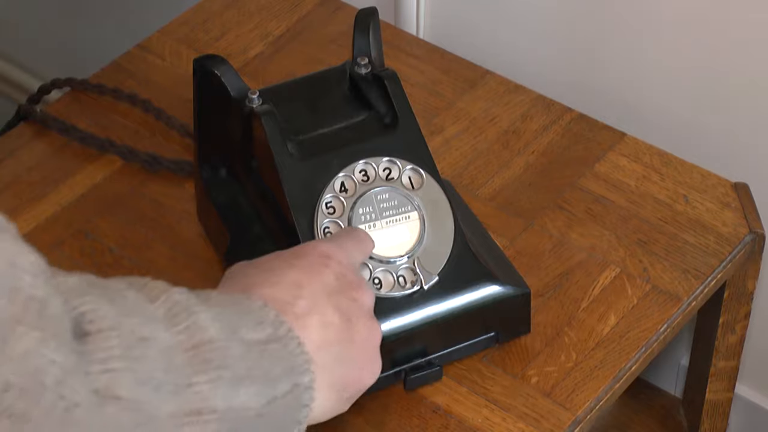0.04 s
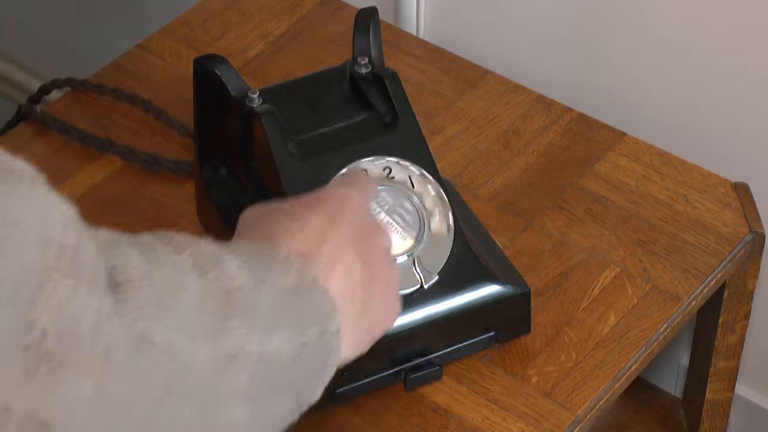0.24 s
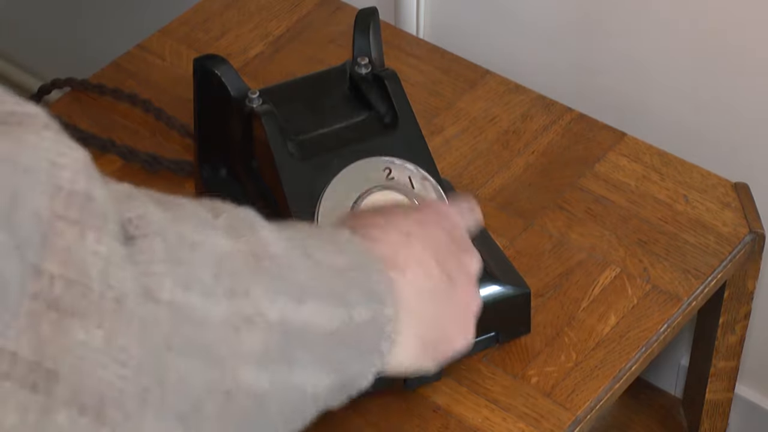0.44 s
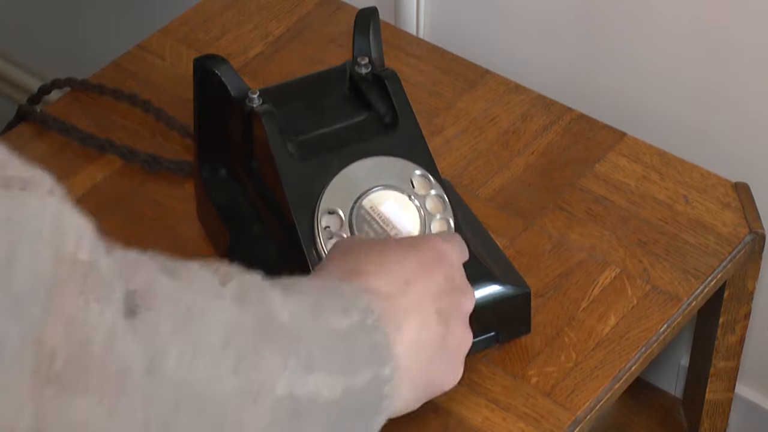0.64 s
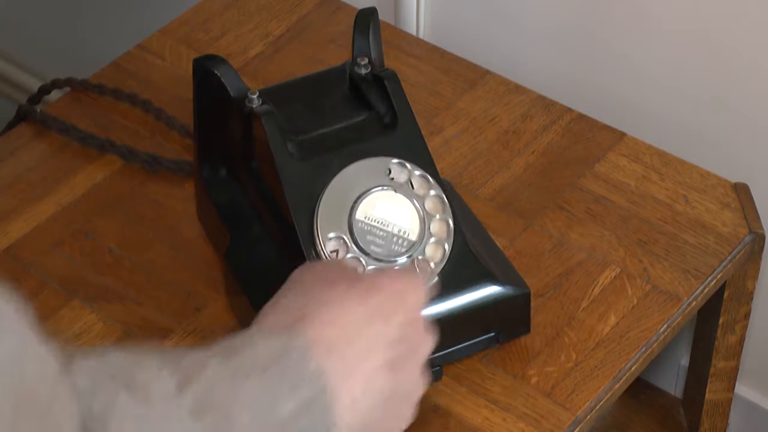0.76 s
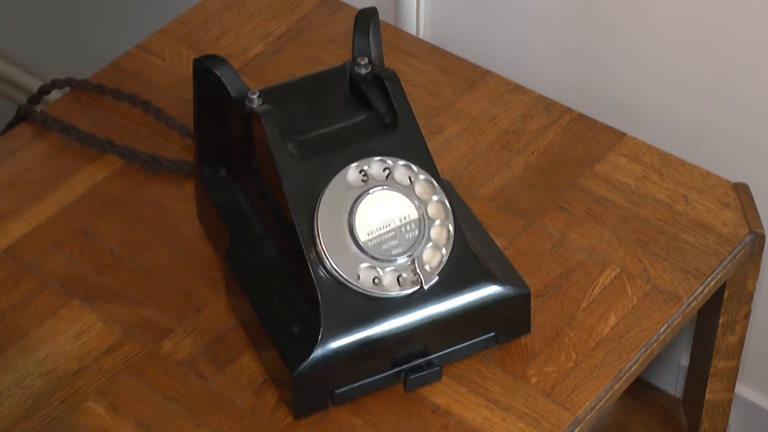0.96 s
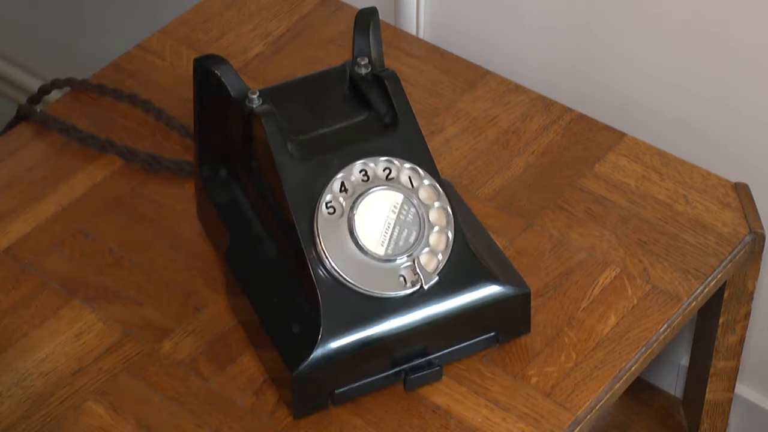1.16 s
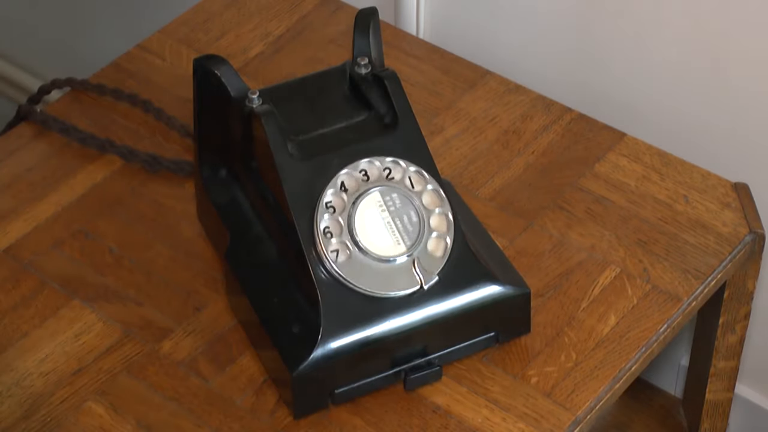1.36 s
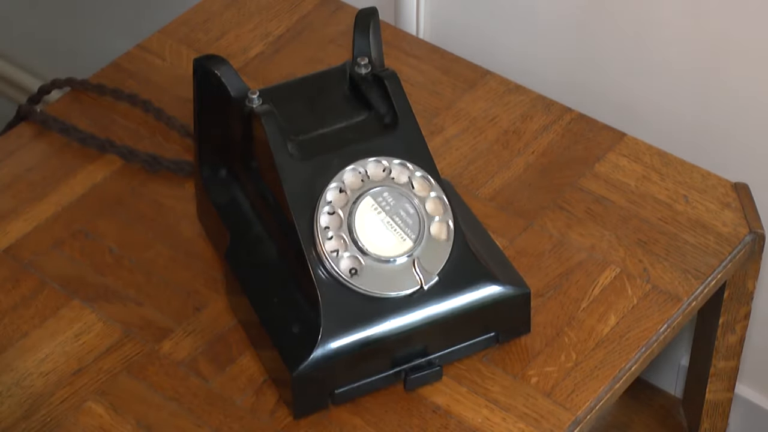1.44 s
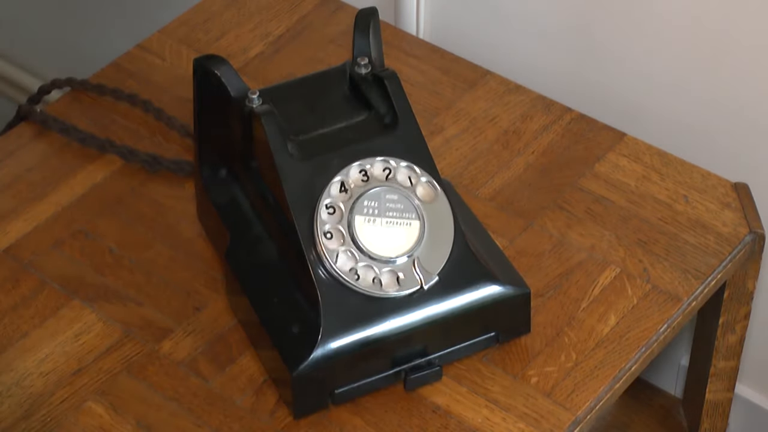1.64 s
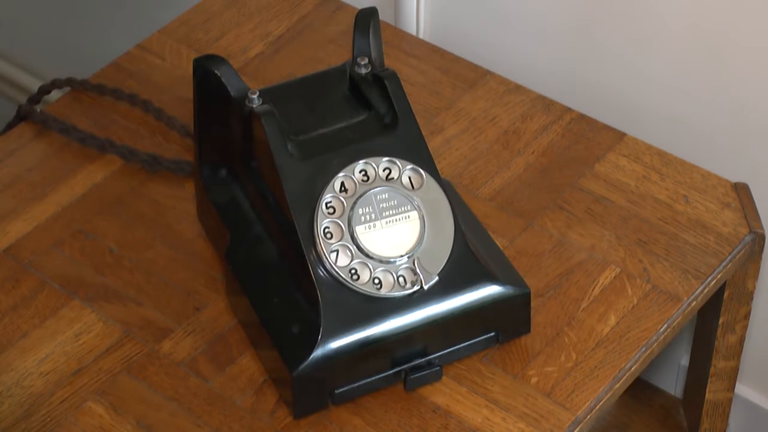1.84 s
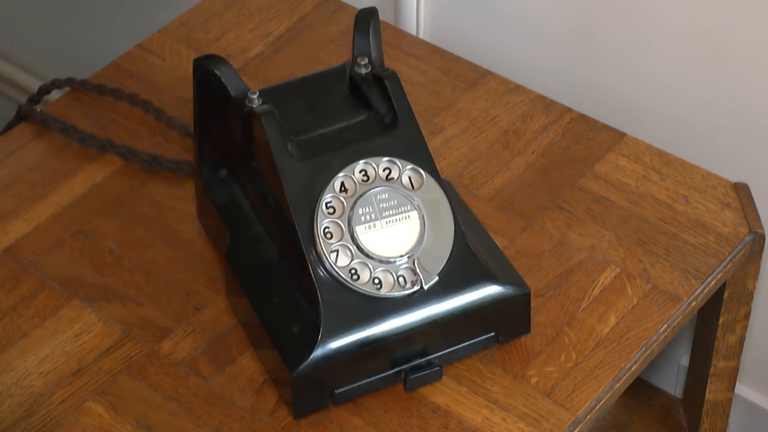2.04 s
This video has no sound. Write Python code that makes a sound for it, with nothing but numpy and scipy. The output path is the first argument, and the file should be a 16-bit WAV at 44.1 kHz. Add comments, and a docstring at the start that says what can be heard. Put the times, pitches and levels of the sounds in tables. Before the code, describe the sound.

Rotary phone dialling one digit: ratcheting clicks, a metallic clink and a rattling return.

```python
"""An old rotary telephone on a wooden table in a quiet room, microphone close by. One digit is dialled.
A finger catches the wheel and winds it over a clicking ratchet until it meets the metal stop.
Let go, the wheel runs back: gears and governor rattle and briefly squeal, and contacts tick.
The wheel knocks home, and a faint rustle follows over the low hum and hiss of the room."""
import sys
import numpy as np
from scipy import signal
from scipy.fft import rfft, irfft
from scipy.io import wavfile
from scipy.ndimage import uniform_filter1d

SR = 44100
rng = np.random.default_rng(int(sys.argv[2]) if len(sys.argv) > 2 else 0)


def master_out(mix):
    """Clip the mix to full scale and print it as 16-bit PCM to the path in sys.argv[1]."""
    frames = np.transpose(np.atleast_2d(mix))
    ceiling = np.clip(frames, -1, 1)
    pcm = np.round(ceiling * 32767).astype(np.int16)
    wavfile.write(sys.argv[1], SR, pcm)


N = 92610

# Drive of the returning wheel: time_s, relative_db
RETURN_DRIVE = [(.706, -50), (.717, -33.5), (.76, -33), (.92, -30), (.98, -32.5), (1.06, -31.5),
                (1.15, -31), (1.19, -32.5), (1.28, -29.5), (1.385, -33), (1.5, -29.5), (1.61, -27),
                (1.636, -36.5), (1.66, -30), (1.69, -33), (1.8, -32), (1.816, -31), (1.83, -58)]
# Ticks of contacts and gear play: time_s, works_relative_db, snap_relative_db
CONTACT_TICKS = [(0.758, -35, -24), (.776, -18.5, -25), (.81, -32, -25.5), (.843, -42, -21.5),
                 (0.87, -32, -37), (.931, -24, -25), (0.963, -40, -30), (.977, -38, -31), (1, -23, -22),
                 (1.016, -22.5, -26), (1.04, -24.5, -37), (1.073, -46, -28), (1.127, -49, -24),
                 (1.143, -23.5, -24), (1.16, -19, -30), (1.217, -24, -23.5), (1.323, -22.5, -24),
                 (1.361, -20.5, -28), (1.398, -20.5, -27.5), (1.429, -25, -27.5), (1.467, -18.5, -25),
                 (1.516, -33, -24), (1.547, -44, -33), (1.597, -24, -33), (1.65, -21, -32),
                 (1.661, -22, -26), (1.706, -22.5, -23), (1.744, -22, -45), (1.766, -36, -25.5),
                 (1.803, -22, -31)]
# Resonances of the works and of the ticks' bright snap: pitch_hz, width_hz, gain_db
WORKS_MODES = [(391, 25, 4), (959, 26.8, 16.5), (1070, 82, 10.5), (1515, 33, 13.5), (1543, 153, 8),
               (1944, 116, 5), (2401, 205, 14.5), (2500, 71, 18.5), (2850, 76, 2.5), (3012, 134, 10),
               (3660, 180, 5.5), (4600, 350, 2.5), (5530, 60, 0), (8100, 69, 4.5), (9160, 40, 5),
               (9315, 49, 11.5), (11000, 290, -7), (12900, 300, -17), (14100, 350, -17)]
SNAP_MODES = [(3760, 160, 2), (4220, 170, -8), (4750, 440, 10.5), (8330, 350, -1), (9260, 170, 3.5)]
# Broad tone under each set of resonances: frequency_hz, gain_db
WORKS_COLOUR = [(120, -17.5), (240, -1), (500, -10.5), (800, -8), (1250, -2.5), (1750, -15), (3300, -10.5),
                (4200, 5), (5400, -5), (6600, 2.5), (7300, -4), (7800, 1), (8800, -7.5), (10200, -12.5),
                (11700, -21), (15500, -30)]
SNAP_COLOUR = [(500, -26), (2000, -12), (3300, -5), (5400, -3.5), (6600, -3), (8800, -21), (10200, -23),
               (15500, -35)]


def running_back(t, governor_hz=27.49, teeth=12, slips_per_s=7000, scatter_db=2, tick_decay_s=0.0065):
    """Tiny slips of governor and gears ring the works; the contacts tick over them."""
    wander = 0.00995 * unit(uniform_filter1d(rng.standard_normal(N), size=4000))
    angle = 2 * np.pi * np.cumsum(governor_hz * (1 + wander)) / SR
    # Friction swings once a turn, once for each of two weights and once for each tooth.
    grip = np.exp(0.12 * np.cos(angle) + 0.15 * np.cos(2 * angle) + 0.35 * np.cos(teeth * angle))
    slips = (rng.random(N) < slips_per_s / SR) * np.sign(rng.standard_normal(N))
    slips *= undb(scatter_db * rng.standard_normal(N))
    drive = undb(np.interp(t, *np.array(RETURN_DRIVE).T, left=-np.inf, right=-np.inf))
    friction = unit(slips * grip) * drive
    lead_s = tick_decay_s / 2  # each tick starts to swell just before its time
    jolts = blows([(at - lead_s, db, tick_decay_s) for at, db, _ in CONTACT_TICKS], attack=0.58)
    snaps = blows([(at - lead_s, db, tick_decay_s) for at, _, db in CONTACT_TICKS], attack=0.51)
    works = ring(undb(-0.6) * friction + undb(-8) * jolts, body(WORKS_COLOUR, WORKS_MODES))
    bright_ticks = ring(undb(-8) * snaps, body(SNAP_COLOUR, SNAP_MODES))
    return works + singing(t, friction) + bright_ticks


# Ratchet clicks: start_s, relative_db, decay_s, pitch_hz, ring_db, shared_modes_db
RATCHET_CLICKS = [(0.2463, -24, 0.0025, 6940, 8, -12), (0.3043, -26, 0.0029, 4470, 13, 0),
                  (.3268, -30.5, 0.0033, 12200, -5, 0), (0.3355, -30.5, 0.0019, 4000, -7, 7),
                  (0.3624, -23, 0.004, 4670, -6, 0), (0.3932, -23, 0.0047, 4370, -3, 2),
                  (.425, -22, 0.0037, 4250, -3, -2), (0.4605, -23, 0.0043, 4200, -3, -2.5),
                  (0.4919, -24, 0.011, 3820, -2, 0.5), (0.5199, -23.5, 0.011, 3800, -4, 2),
                  (0.5438, -20.5, 0.0078, 4030, 9, 2)]
# Pawl resonances shared by all clicks: pitch_hz, width_hz, gain_db
PAWL_MODES = [(1112, 98, 4.5), (1935, 114, 3.5), (2700, 320, -5.5), (3737, 130, 5.5), (6500, 250, 2.5),
              (7400, 320, 2)]
# Broad tone of the pawl: frequency_hz, gain_db
PAWL_COLOUR = [(200, -9), (750, -18), (1300, -11), (3300, -5.5), (4400, -0.5), (5300, -1.5), (5680, -7),
               (6100, -1), (8000, -3), (10000, -16.5), (15500, -28)]


def ratchet(gain_db=-8, width_ratio=0.095):
    """The pawl drops over the teeth as the wheel is wound, each click with a ring of its own."""
    clicks = np.zeros(N)
    for at, db, decay, hz, ring_db, shared_db in RATCHET_CLICKS:
        modes = [(pitch, width, mode_db + shared_db) for pitch, width, mode_db in PAWL_MODES]
        modes.append((hz, width_ratio * hz, ring_db))
        clicks += ring(blows([(at, db, decay)]), body(PAWL_COLOUR, modes))
    return undb(gain_db) * clicks


# The finger on the metal stop: start_s, relative_db, decay_s
STOP_HITS = [(.5592, -22, 0.0031), (.5608, -15.5, 0.0026), (0.5674, -26, 0.0022)]
# Resonances of the stop: pitch_hz, width_hz, gain_db
STOP_MODES = [(255, 17, 9), (980, 130, 3), (1630, 90, 1), (2110, 190, 6.5), (2370, 130, 13.5),
              (2900, 230, 3.5), (3800, 69, -6), (4420, 63, -8), (6520, 51, 17.5), (6870, 21, 17),
              (7900, 200, -3)]
# Its broad tone: frequency_hz, gain_db
STOP_COLOUR = [(100, -27), (350, -2), (700, -16), (1300, 0.5), (3000, -12), (5200, -2.5), (6500, 5.5),
               (8500, -5), (10500, -17.5), (15500, -29)]
# Its lingering modes: pitch_hz, t60_s, gain_db
STOP_AFTER_RING = [(2400, .28, -5), (6730, .16, 0), (6970, .3, -4)]


def finger_stop(t, gain_db=-7, after_ring_db=-39):
    """The finger strikes the metal stop, which rings on after the hardest hit."""
    after_ring = chime(t, STOP_HITS[1][0], after_ring_db, STOP_AFTER_RING)
    strike = ring(blows(STOP_HITS), body(STOP_COLOUR, STOP_MODES))
    return undb(gain_db) * strike + after_ring


# The wheel is caught, and later comes home: start_s, crack_relative_db, decay_s, ping_relative_db
WHEEL_KNOCKS = [(0.2007, -32, 0.0021, -32), (0.2036, -27, 0.0035, -24.5), (.207, -32.5, 0.0025, -48),
                (1.818, -22, 0.0036, -24.5), (1.8243, -28, 0.0018, -45)]
# Ping of the wheel: pitch_hz, t60_s, gain_db
WHEEL_MODES = [(1072.5, 0.039, -2), (4650, 0.02, 3), (4970, 0.031, 0), (5180, 0.025, -5), (8100, 0.028, -5),
               (8650, 0.027, -14)]
# Broad tone of its crack: frequency_hz, gain_db
WHEEL_COLOUR = [(200, -14), (750, -10.5), (1400, -9), (3300, -4), (5000, 2.5), (5900, -0.5), (7300, -4),
                (8500, -2), (9500, -3.5), (10000, -28), (15500, -27)]


def wheel_knocks(t, crack_gain_db=-8):
    """The finger wheel knocks against its rest: a dry crack and a pitched ping."""
    crack = ring(blows([(at, db, decay) for at, db, decay, _ in WHEEL_KNOCKS]), body(WHEEL_COLOUR))
    ping = sum(chime(t, at, db, WHEEL_MODES) for at, _, _, db in WHEEL_KNOCKS)
    return undb(crack_gain_db) * crack + ping


# Squeals of the governor: peak_s, level_db
SQUEALS = [(.846, -22), (0.931, -23.5), (1.294, -21.5), (1.363, -23), (1.468, -15), (1.652, -21.5),
           (1.719, -24), (1.798, -18.5)]


def governor_squeals(t, pitch_hz=2504, half_length_s=0.0035):
    """The governor catches and its strongest resonance swells for a moment."""
    squeals = np.zeros(N)
    for at, db in SQUEALS:
        envelope = undb(db) * np.exp(-((t - at) / half_length_s) ** 2)
        squeals += envelope * np.sin(2 * np.pi * (pitch_hz * t + rng.random()))
    return squeals


# Metallic ring of the returning wheel: time_s, pitch_hz, relative_db
SINGING_PATH = [(.72, 4810, -6), (1.1, 4860, -8.5), (1.35, 4930, -8.5), (1.6, 4620, -14), (1.8, 4860, -5)]


def singing(t, friction, width_hz=290):
    """Friction excites one narrow resonance whose centre shifts as the wheel turns."""
    times, hz, db = np.array(SINGING_PATH).T
    carrier = np.exp(2j * np.pi * np.cumsum(np.interp(t, times, hz)) / SR)
    narrow = signal.sosfilt(signal.butter(2, width_hz / 2, fs=SR, output="sos"), friction / carrier)
    return np.real(narrow * carrier) * np.sqrt(2 * SR / width_hz) * undb(np.interp(t, times, db))


# Reflections reaching the microphone from table and walls: delay_s, gain_db
REFLECTIONS = [(.0021, -13.5), (.0078, -16), (0.0139, -11)]


def room(direct, t60_s=0.23, treble_t60_s=0.18, tail_db=-7.5, tail_delay_s=0.005, split_hz=5000):
    """Nearby surfaces add a few reflections and a short tail whose treble dies first."""
    t = np.arange(SR // 2) / SR
    noise = rng.standard_normal(len(t))
    low = signal.sosfiltfilt(signal.butter(2, split_hz, fs=SR, output="sos"), noise)
    tail = low * undb(-60 * t / t60_s) + (noise - low) * undb(-60 * t / treble_t60_s)
    tail *= t > tail_delay_s
    response = undb(tail_db) * tail / np.sqrt(np.sum(tail ** 2))
    for delay, db in REFLECTIONS:
        response[int(delay * SR)] += undb(db)
    return direct + ring(direct, response)


# Room tone at the microphone: frequency_hz, gain_db
AIR_COLOUR = [(12, -18), (20, -10.5), (55, -8), (120, -12), (138, -14), (172, -14.5), (301, -18.5),
              (337, -18), (377, -18), (410, -21), (660, -24), (976, -24), (6360, -36), (6910, -34.5),
              (16000, -42.5)]
# Mains hum and a faint whine: pitch_hz, rms_db
HUM_TONES = [(50, -52.5), (7040, -69)]


def room_tone(t, air_db=-46):
    """Steady air and hum, a deep swell while the wheel runs back and a faint rustle afterwards."""
    air = undb(air_db) * unit(ring(rng.standard_normal(N), body(AIR_COLOUR)))
    hum = sum(np.sqrt(2) * undb(db) * np.sin(2 * np.pi * hz * t) for hz, db in HUM_TONES)
    rumble = swell(t, peak_s=1.346, half_length_s=0.11, level_db=-33.5, band_hz=(9.7, 25.7))
    rustle = swell(t, peak_s=1.97, half_length_s=0.021, level_db=-53, band_hz=(2100, 5900))
    return air + hum + rumble + rustle


def swell(t, peak_s, half_length_s, level_db, band_hz):
    """A band of noise that comes and goes."""
    noise = signal.sosfilt(signal.butter(2, band_hz, "band", fs=SR, output="sos"), rng.standard_normal(N))
    return undb(level_db) * unit(noise) * np.exp(-((t - peak_s) / half_length_s) ** 2)


def blows(rows, attack=0.15, level_window=441):
    """Short scrapes of even spectrum, each rising over a share of its decay; levels are rms over 10 ms."""
    out = np.zeros(N)
    t = np.arange(level_window * 4) / SR
    for at, db, decay in rows:
        envelope = (1 - np.exp(-t / (attack * decay))) ** 2 * np.exp(-t / decay)
        spectrum = rfft(rng.standard_normal(len(t)) * envelope)
        push = irfft(spectrum / np.abs(spectrum)) * np.sqrt(envelope)
        start = int(at * SR)
        out[start:start + len(t)] += push * undb(db) * np.sqrt(level_window / np.sum(push ** 2))
    return out


def chime(t, start_s, level_db, modes, attack_s=0.0017):
    """Modes swell quickly after a knock and fade, each at its own rate."""
    age = np.maximum(t - start_s, 0)
    tones = np.zeros(N)
    for hz, t60, mode_db in modes:
        envelope = undb(level_db + mode_db - 60 * age / t60)
        tones += envelope * np.sin(2 * np.pi * (hz * age + rng.random()))
    return -np.expm1(-age / attack_s) * tones


def body(colour, modes=(), size=8192):
    """Impulse response of unit energy: resonances standing on a broad tone."""
    freqs = np.maximum(np.arange(size // 2 + 1) * SR / size, 1)
    colour_hz, colour_db = np.array(colour).T
    power = undb(np.interp(np.log(freqs), np.log(colour_hz), colour_db)) ** 2
    for hz, width, db in modes:
        power += undb(db) ** 2 / (1 + 2 * ((freqs - hz) / width) ** 2) ** 2
    # Minimum phase: the ring follows the blow and never precedes it.
    cepstrum = irfft(np.log(power) / 2)
    cepstrum[1:size // 2] *= 2
    cepstrum[size // 2 + 1:] = 0
    response = irfft(np.exp(rfft(cepstrum)))
    return response / np.sqrt(np.sum(response ** 2))


def ring(sound, response):
    """Pass a sound through an impulse response."""
    return signal.fftconvolve(sound, response)[:N]


def undb(db):
    """Decibels to gain."""
    return 10 ** (np.asarray(db) / 20)


def unit(x):
    """Scale to rms 1."""
    return x / np.sqrt(np.mean(x ** 2))


def scene():
    """The dial in its room, heard from one close microphone."""
    t = np.arange(N) / SR
    dial = wheel_knocks(t) + ratchet() + finger_stop(t) + running_back(t)
    return (room(dial) + governor_squeals(t) + room_tone(t))[None]


def record(dry, cutoff_hz=16150):
    """The recorder cuts the highest treble steeply."""
    return signal.sosfilt(signal.ellip(10, 0.2, 80, cutoff_hz, fs=SR, output="sos"), dry)


dry = scene()
out = record(dry)
master_out(out)
```